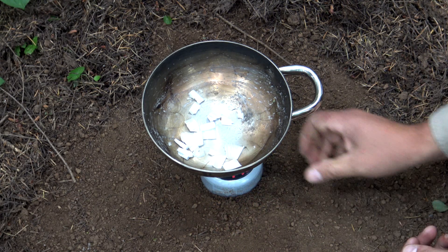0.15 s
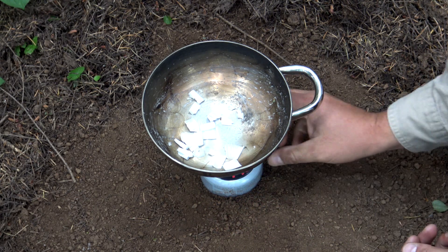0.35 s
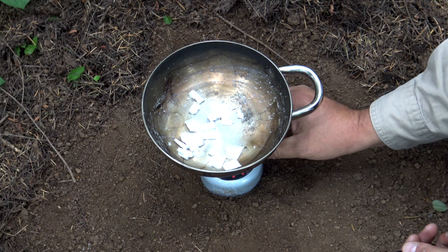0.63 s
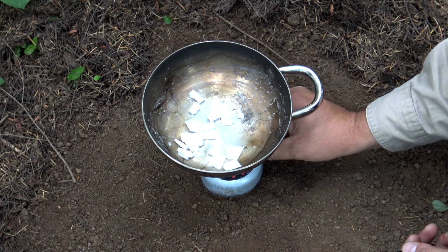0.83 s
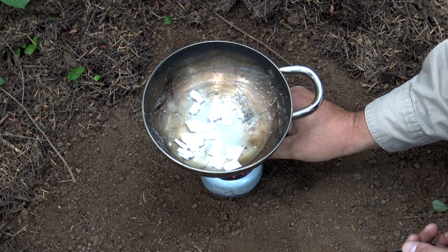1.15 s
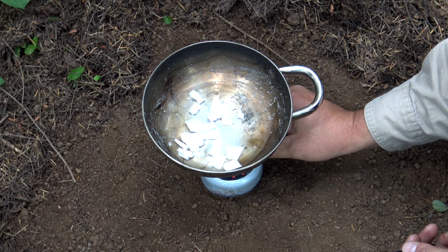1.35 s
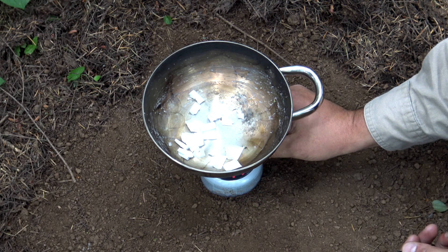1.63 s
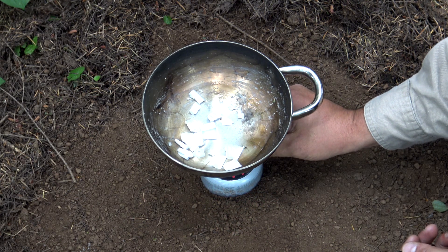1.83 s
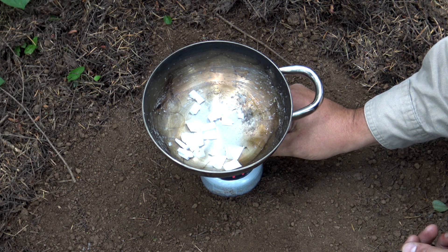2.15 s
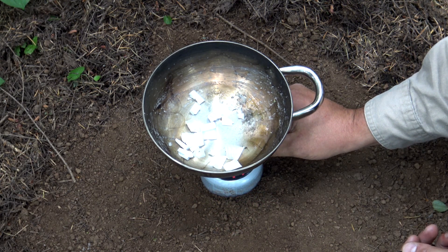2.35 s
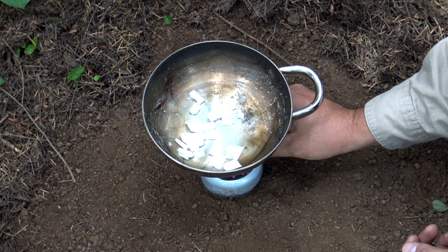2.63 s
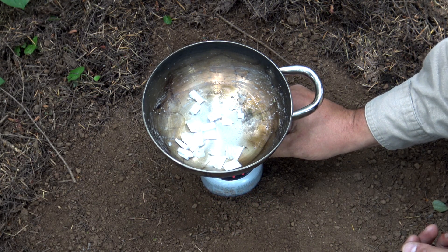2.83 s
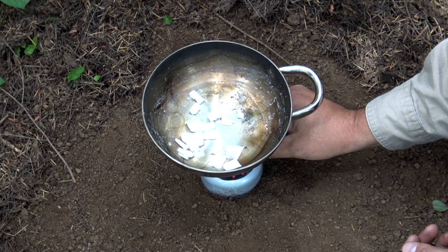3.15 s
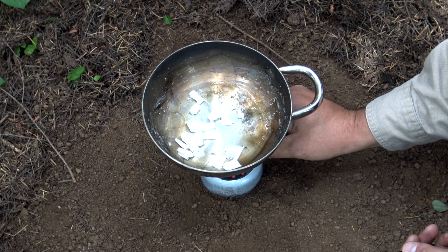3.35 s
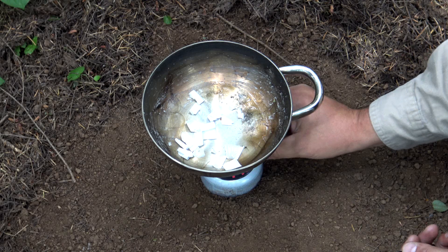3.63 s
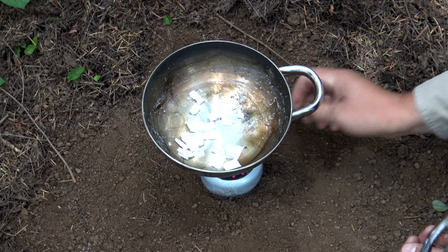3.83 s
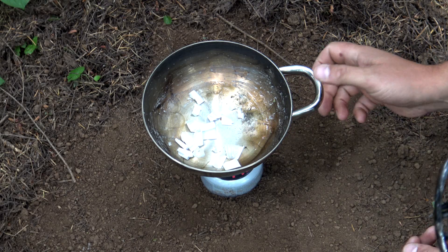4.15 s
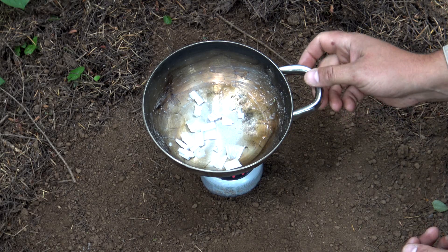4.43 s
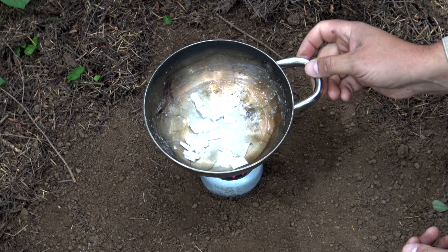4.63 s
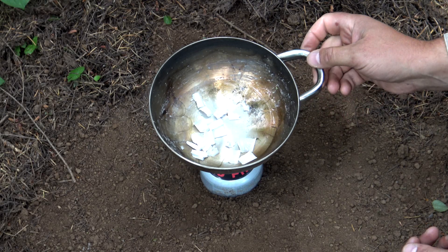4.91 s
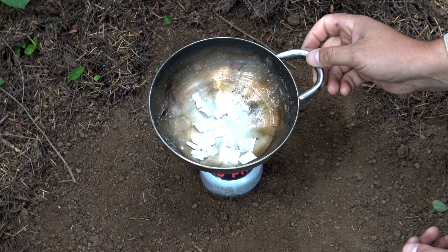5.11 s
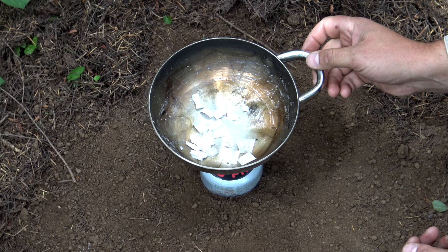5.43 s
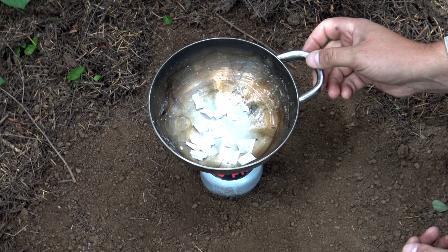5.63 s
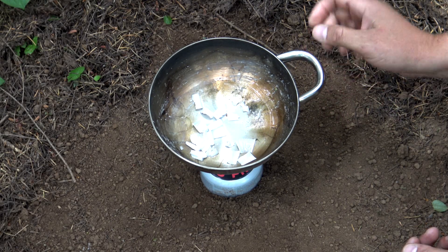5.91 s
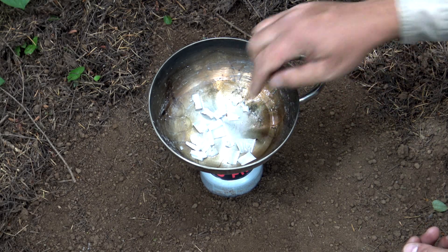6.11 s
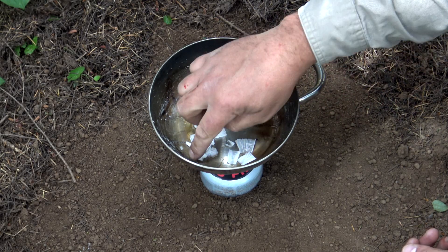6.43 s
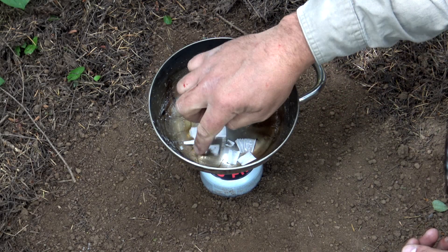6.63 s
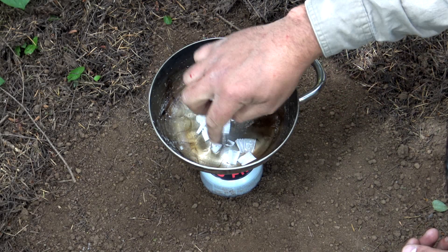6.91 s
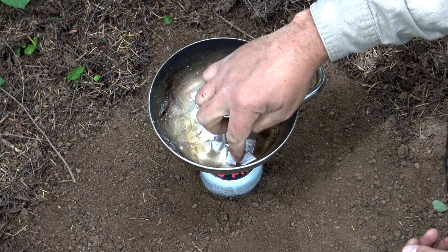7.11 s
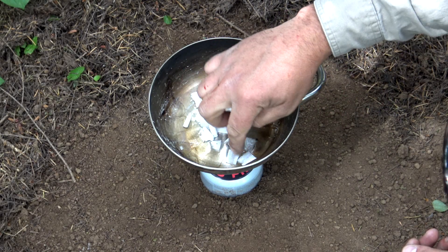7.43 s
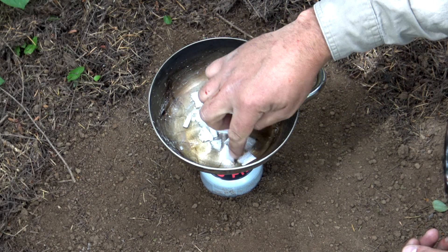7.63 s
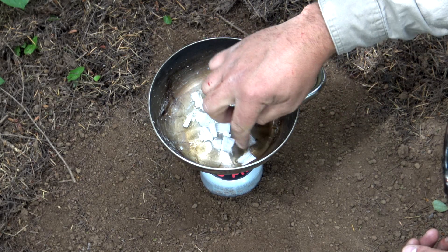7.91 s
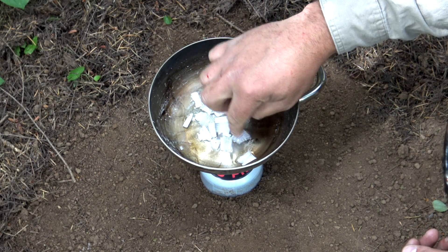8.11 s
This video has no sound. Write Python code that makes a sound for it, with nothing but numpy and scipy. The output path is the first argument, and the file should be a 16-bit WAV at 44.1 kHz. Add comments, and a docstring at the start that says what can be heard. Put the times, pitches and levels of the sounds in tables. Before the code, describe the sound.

Outdoors among trees, a nearby gas burner gives a quiet, even hiss with faint birdsong far behind it. A few soft low flutters come from the flame. About halfway through, a barely audible hum joins in and a steel pan clicks and scrapes lightly on the stove. The birds fade out, and the pan lands with a single sharp, chattering metal tap, the loudest sound, followed by a small tick.

```python
"""Gas stove in a wood

A small gas stove hisses under a steel pan on the ground, while far birds sing through the trees.
A hand trims the valve and the flame flutters; a soft low drone comes in. The pan, shifted by its
handle, scrapes and clicks on the supports, each impact exciting the modes of pan, stand and canister.
A finger stirs the food and tips the pan, which comes down with one sharp, chattering tap."""
import sys
import numpy as np
from scipy import signal
from scipy.fft import rfft, irfft
from scipy.io import wavfile

SR = 44100
rng = np.random.default_rng(int(sys.argv[2]) if len(sys.argv) > 2 else 0)


def master_out(mix):
    """Clip the mix to full scale and print it as 16-bit PCM to the path in sys.argv[1]."""
    frames = np.transpose(np.atleast_2d(mix))
    ceiling = np.clip(frames, -1, 1)
    pcm = np.round(ceiling * 32767).astype(np.int16)
    wavfile.write(sys.argv[1], SR, pcm)


N = 364707
T = np.arange(N) / SR
FREQS = np.fft.rfftfreq(N, 1 / SR)


def undb(db):
    """Amplitude ratio of a level in decibels."""
    return 10 ** (np.asarray(db) / 20)


def unit(x):
    """Normalisation to rms 1."""
    return x / np.sqrt(np.mean(x ** 2))


def shape(points):
    """Frequency response through (f/Hz, level/dB) points, interpolated in log frequency."""
    hz, db = np.transpose(points)
    return undb(np.interp(np.log(FREQS + 1), np.log(hz), db))


def resonance(hz, width_hz):
    """Lorentzian peak of height 1."""
    return 1 / (1 + (2 * (FREQS - hz) / width_hz) ** 2)


def colour(x, gain):
    """Linear filtering by multiplication of spectra."""
    return irfft(rfft(x) * gain, N)


def noise(gain):
    """Filtered Gaussian noise of rms 1."""
    return unit(colour(rng.standard_normal(N), gain))


def walk(rate_hz):
    """Random modulator: low-pass noise of rms 1."""
    return noise(np.exp(-(FREQS / rate_hz) ** 2))


def add(out, s, x):
    """Superposition of a short sound at time s."""
    i = int(s * SR)
    out[i:i + len(x)] += x[:N - i]


def stereo(mid, side, pan_db):
    """Sum and difference stereophony; pan_db is left minus right."""
    return np.array([(mid + side) * undb(pan_db / 2), (mid - side) / undb(pan_db / 2)])


def fade(t, t60):
    """Exponential decay, 60 dB down at t60."""
    return np.exp(-np.log(1000) * t / t60)


def swells(rows, attack_s, release_s):
    """Envelope of linear rises, holds and exponential releases."""
    return sum(undb(db) * np.clip((T - s) / attack_s, 0, 1)
               * np.exp(-np.maximum(T - s - length, 0) / release_s) for s, length, db in rows)


# spectrum of the gas jet (f/Hz, level/dB)
JET_SPECTRUM = [(12, -39), (20, -14), (54, 0.5), (92, -3.5), (129, -5.5), (232, -6), (382, -6.5), (427, -5),
                (788, -6.5), (958, -5), (1340, -9), (1980, -10.5), (4550, -14.5), (7110, -19),
                (15500, -28.5)]
# resonances of the hollow under the pan (f/Hz, bandwidth/Hz, boost/dB)
CAVITY_MODES = [(420, 18, 4), (873.5, 18, 8), (973, 28, 1.5), (1650, 200, 0.5)]
# stereo width of the hiss (f/Hz, side minus mid/dB)
HISS_WIDTH = [(60, -19), (110, -13), (200, -10.5), (380, -12), (700, -14), (1290, -12.5), (2380, -16),
              (4400, -15), (8120, -3.5), (15000, -10)]


def burner_hiss(level_db=-54.5, flicker_db=0.5, drift_db=0.56):
    """Jet turbulence makes broadband noise, coloured by cavity resonance under the pan."""
    cavity_db = sum(db * resonance(hz, width) for hz, width, db in CAVITY_MODES)
    spectrum = shape(JET_SPECTRUM) * undb(cavity_db)
    mid = noise(spectrum)
    side = colour(noise(spectrum), shape(HISS_WIDTH))
    # the flame's roar is unsteady, the jet above it is smooth
    roar = colour(mid, 1 / (1 + (FREQS / 1500) ** 4))
    mid = mid + roar * (undb(flicker_db * walk(3.6)) - 1)
    return stereo(mid, side, pan_db=-1.03) * undb(level_db + drift_db * walk(1.0))


def trees(x, t60, build_s):
    """Reverberation: scattering off trunks and leaves builds up and dies away."""
    t = T[:SR]
    echoes = rng.standard_normal(SR) * fade(t, t60) * (1 - np.exp(-t / build_s))
    return signal.fftconvolve(x, echoes / np.linalg.norm(echoes))[:N]


# spells of faint birdsong (start/s, end/s)
TWITTER_SPELLS = [(1.15, 4.2), (4.95, 6.45)]


def twitter(per_s=8.9, length_s=0.0796, centre_hz=3490, spread_octaves=.5, depth_hz=298, db=-63.5):
    """Random scatter in onset, length, pitch and trill gives rows of faint bird notes."""
    starts = np.concatenate([np.arange(start, end, 1 / per_s) for start, end in TWITTER_SPELLS])
    for s, (late, length, pitch, depth) in zip(starts, rng.random((len(starts), 4))):
        hz = centre_hz * 2 ** (spread_octaves * (2 * pitch - 1))
        yield s + late / per_s / 2, length_s * (.5 + length), hz, depth_hz * (.5 + depth), db


# the clearest bird notes (t/s, duration/s, f/Hz, trill depth/Hz, level/dB)
BIRD_NOTES = [(1.201, 0.13, 3550, 346, -63), (1.513, .11, 4900, 260, -57), (1.53, 0.031, 6970, 120, -56.5),
              (1.702, 0.11, 3020, 347, -59), (1.911, 0.073, 3960, 258, -55), (2.026, 0.21, 3125, 422, -57),
              (2.145, 0.037, 3690, 90, -55), (2.252, 0.052, 4920, 85, -53.5), (2.316, 0.16, 3340, 80, -58),
              (2.577, 0.11, 3755, 74, -52), (2.728, .45, 4230, 249, -66.5), (2.793, 0.17, 2850, 85.4, -58),
              (3.279, 0.16, 6090, 300, -62.5), (3.395, 0.047, 5050, 403, -54),
              (3.459, 0.23, 2965, 221, -58), (3.532, 0.058, 5250, 263, -56), (3.854, 0.36, 4180, 231, -59),
              (3.897, 0.56, 3150, 284, -62.5), (5.011, .15, 4410, 418, -60.5), (5.231, 0.1, 3090, 190, -58),
              (5.322, .1, 3710, 85, -56), (5.451, 0.15, 5300, 450, -56), (5.551, 0.073, 4500, 380, -52.5),
              (5.636, 0.53, 5340, 670, -60), (5.637, .15, 3180, 130, -59.5), (5.764, .13, 2770, 280, -58.5),
              (5.906, 0.24, 4210, 425, -57), (6.067, .22, 3390, 518, -56), (6.166, 0.16, 4900, 473, -59),
              (6.35, 0.062, 2620, 199, -58.5), (6.427, 0.075, 3760, 110, -60.5),
              (6.757, 0.066, 7070, 120, -59)]


def birds(trill_hz=62, wander=.6, fall=.7, rough_db=3, direct_db=-8, side_db=-13):
    """Frequency modulation: shallow trills whistle, deep ones buzz; from afar, echoes dominate."""
    song = np.zeros(N)
    waver, effort = walk(264), undb(rough_db * walk(73))
    for s, length, pitch_hz, depth_hz, db in [*BIRD_NOTES, *twitter()]:
        n, i = int(length * SR), int(s * SR)
        trill = 0.835 * np.sin(2 * np.pi * trill_hz * T[:n]) + wander * waver[i:i + n]
        hz = pitch_hz + depth_hz * (trill + fall * np.linspace(.5, -.5, n))
        swell = signal.windows.tukey(n, .3) * effort[i:i + n]
        add(song, s, undb(db) * unit(swell * np.sin(2 * np.pi * np.cumsum(hz) / SR)))
    mid, side = (trees(song, t60=1.23, build_s=0.00058) for _ in range(2))
    return stereo(mid + undb(direct_db) * song, undb(side_db) * side, pan_db=-0.8)


# spectrum of the fluttering flame (f/Hz, level/dB)
FLUTTER_SPECTRUM = [(20, -29), (50, -7), (80, 3.5), (130, -2), (200, -3.5), (300, -11), (700, -28),
                    (2000, -66)]
# flares as the valve is turned (t/s, duration/s, level/dB)
VALVE_FLARES = [(1.72, 0.022, -58), (1.84, .08, -73), (2.275, 0.049, -54.5), (2.47, 0.23, -56),
                (2.83, .1, -76)]


def flame_flutter(idle_db=-70.5, gust_db=2.5, side_db=-21.5):
    """Unsteady combustion radiates a low rumble that swells while the valve is turned."""
    flaring = undb(idle_db) + swells(VALVE_FLARES, attack_s=0.0068, release_s=0.069)
    flutter = noise(shape(FLUTTER_SPECTRUM)) * flaring * undb(gust_db * walk(20))
    return stereo(flutter, undb(side_db) * flutter, pan_db=-0.5)


# the pan slides on its supports, the food in the pan (t/s, duration/s, level/dB)
SLIDES = [(3.07, 0.042, -66), (4.62, 0.14, -65), (4.76, 0.037, -58), (6.67, .2, -67.5), (7.7, .55, -78)]


def scrapes(grain_db=3.0, side_db=-14):
    """Stick-slip friction on steel makes a fine, bright rasp."""
    rasp = shape([(1000, -25), (5500, -18), (8500, -1), (11000, -4), (13500, -10), (15500, -19)])
    slips = swells(SLIDES, attack_s=.03, release_s=0.076) * unit(undb(grain_db * walk(700)))
    return stereo(noise(rasp), undb(side_db) * noise(rasp), pan_db=0) * slips


def drone(start_s=3.9, rise_s=0.34, hz=232, width_hz=45, level_db=-70.5, waver_db=2):
    """Narrow-band noise is heard as a soft, wavering low note."""
    envelope = np.clip((T - start_s) / rise_s, 0, 1) * undb(level_db + waver_db * walk(2.6))
    return stereo(noise(resonance(hz, width_hz)) * envelope, 0, pan_db=-4.5)


# steel strikes steel (t/s, tick level/dB, pan level/dB, stove body level/dB, chatter/s)
STEEL_IMPACTS = [(4.578, -36, -54, -47, 0.0022), (4.663, -56, -68, -70, .001),
                 (4.79, -58, -53, -76, 0.0018), (5.383, -41.5, -52, -55, 0.0015),
                 (6.087, -48.5, -70, -67, 0.0095), (7.3375, -28.5, -50, -55, .002),
                 (7.3391, -27, -15, -58, 0.0089), (7.3483, -25.5, -47, -65, 0.0021),
                 (7.4948, -59, -56, -57, .001), (7.8984, -47, -64, -65, 0.0028)]


def clicks(stand_share_db=-14):
    """Impact excitation: each strike drives the pan and the stove's body together."""
    for s, tick_db, pan_db, body_db, chatter_s in STEEL_IMPACTS:
        yield s, *undb([pan_db, body_db + stand_share_db, body_db, tick_db]), chatter_s


# the stove rocks on its stand (t/s, duration/s, first thud level/dB, growth/(dB/s))
ROCKING_RUNS = [(4.601, .02, -35, -600), (5.031, .04, -34.5, 25), (7.344, .04, -31, -30)]


def rocking(first_gap_s=.0176, gap_ratio=0.92, contact_s=0.0017,
            pan_db=-19.5, canister_db=-32, tick_db=-20.5):
    """Inelastic rebound: the stand lands sooner each time, shaking the pan and canister."""
    gaps = first_gap_s * gap_ratio ** np.arange(8)
    delays = np.cumsum(gaps) - gaps
    shares = undb([pan_db, 0, canister_db, tick_db])  # relative to the stand
    for s, length, db, growth in ROCKING_RUNS:
        for delay in delays[delays < length]:
            yield s + delay, *(undb(db + growth * delay) * shares), contact_s


def handling_ticks(start_s=4.6, end_s=8.1, per_s=3, loudest_db=-60, spread_db=8, contact_s=.001):
    """A random point process of tiny contacts while the pan is handled."""
    span_s = end_s - start_s
    for when, softness in rng.random((int(span_s * per_s), 2)):
        yield start_s + when * span_s, 0, 0, 0, undb(loudest_db - spread_db * softness), contact_s


def ring(modes, t):
    """Free vibration as a sum of damped normal modes."""
    return sum(undb(db) * fade(t, t60) * np.sin(2 * np.pi * hz * t) for hz, db, t60 in modes)


# modes of the pan, soil-damped stand, gas canister and pan rim (f/Hz, level/dB, T60/s)
PAN_MODES = [(345, -19, .12), (378, -8, .07), (405, -7.5, .09), (481, -18, .36), (535, -14, .11),
             (692, -9, .22), (724, -8, .16), (876, -9, .17), (910, -10, .25), (998, 2, .115),
             (1281, -24, .22), (1508, -14, .13), (1557, -14, .12), (1680, -26, .3), (1742, -9, .1),
             (1815, -24, .2), (2035, -29, .25), (2216, -31, .42), (2600, -20, .1), (3150, -22, .07)]
STAND_MODES = [(655, -2, 0.048), (690, -8.5, 0.13), (1815, -12, 0.033)]
CANISTER_MODES = [(256, 8, 0.077), (421, 5, 0.086)]
RIM_MODES = [(6140, -16, 0.097), (6270, 1, .09), (8400, -25, 0.063), (8500, -19, 0.043), (8837, -18, .07),
             (9123, -14, 0.049), (9340, -23, 0.056), (9800, -6, .08), (10000, -13, 0.047),
             (10500, -27, 0.064), (11100, 4, .06), (12400, -13, 0.1), (13200, -12, .05)]
# spectrum of a steel-on-steel tick (f/Hz, level/dB)
TICK_SPECTRUM = [(100, -24), (280, -6), (450, 10), (1000, 4), (2000, -5), (2800, -1.5), (4200, -9),
                 (6300, -0.5), (8200, 6), (9400, 5.5), (11000, 0), (13500, -7), (15500, -18)]
# what the wood reflects: much bass, little treble (f/Hz, level/dB)
WOOD_RESPONSE = [(100, 20), (260, 18), (420, 1.5), (1000, -5), (1650, 5.5), (3000, -1), (8000, -9),
                 (15000, -31)]
# directivity of the ringing pan (f/Hz, left minus right/dB)
DIRECTIVITY = [(60, -0.5), (110, 10), (200, -1), (380, -4), (700, 2.5), (1290, -0.5), (2380, -1), (4400, 3),
               (8120, -0.5), (15000, 1)]


def knocks(tick_t60=0.044, tail_t60=0.27, tail_db=-23, rim_share_db=-27,
           wet_db=-23, side_db=-17, wet_side_db=-11):
    """Modal response: contacts ring pan, stand, canister and rim; chattering steel adds noise."""
    t = T[:SR]
    body, tick_power = np.zeros(N), np.zeros(N)
    rings = np.array([ring(modes, t) for modes in (PAN_MODES, STAND_MODES, CANISTER_MODES, RIM_MODES)])
    for s, pan, stand, canister, tick, chatter_s in [*clicks(), *rocking(), *handling_ticks()]:
        gains = np.array([pan, stand, canister, tick * undb(rim_share_db)])
        build = 1 - np.exp(-2 * t / chatter_s)  # the ring builds while the contact chatters
        add(body, s, build * (gains @ rings))
        free_s = np.maximum(t - chatter_s, 0)
        decay = fade(free_s, tick_t60) + undb(tail_db) * fade(free_s, tail_t60)
        add(tick_power, s, (tick * decay) ** 2)
    ticks, ticks_side = (noise(shape(TICK_SPECTRUM)) * np.sqrt(tick_power) for _ in range(2))
    direct = body + ticks
    reflected = undb(wet_db) * colour(direct, shape(WOOD_RESPONSE))
    echo, echo_side = (trees(reflected, t60=1., build_s=0.076) for _ in range(2))
    # each mode radiates in its own direction
    left_over_right = shape(DIRECTIVITY)
    lean = colour(direct, (left_over_right - 1) / (left_over_right + 1))
    side = lean + undb(side_db) * ticks_side + undb(wet_side_db) * echo_side
    return stereo(direct + echo, side, pan_db=-0.7)


def scene():
    """Superposition of the stove and pan close by and the birds far off."""
    return burner_hiss() + birds() + flame_flutter() + scrapes() + drone() + knocks()


def record(dry):
    """Band limiting: a steep elliptic low-pass cuts the top of the treble."""
    cutoff_hz = 15650
    return signal.sosfilt(signal.ellip(10, .1, 70, cutoff_hz, fs=SR, output="sos"), dry)


dry = scene()
out = record(dry)
master_out(out)
```